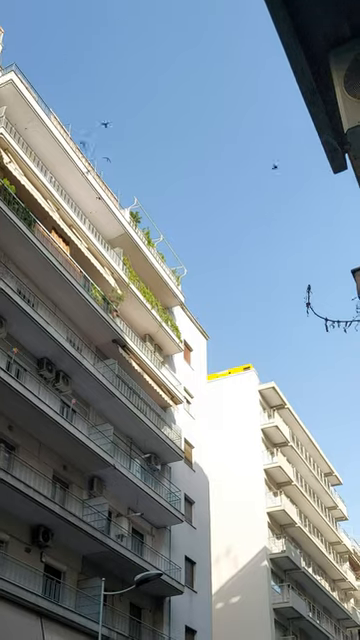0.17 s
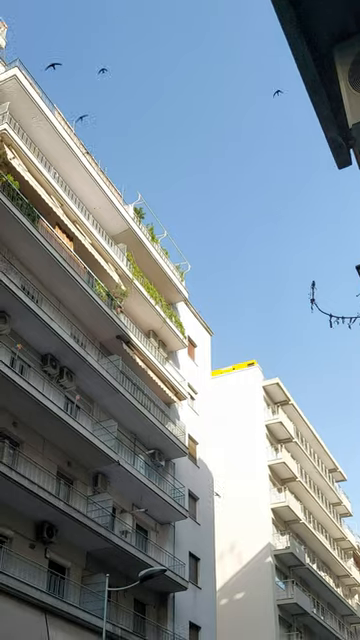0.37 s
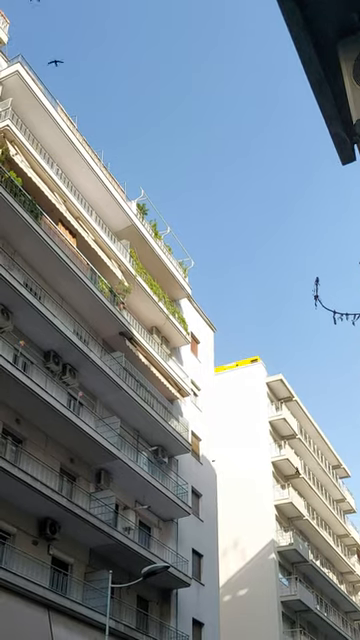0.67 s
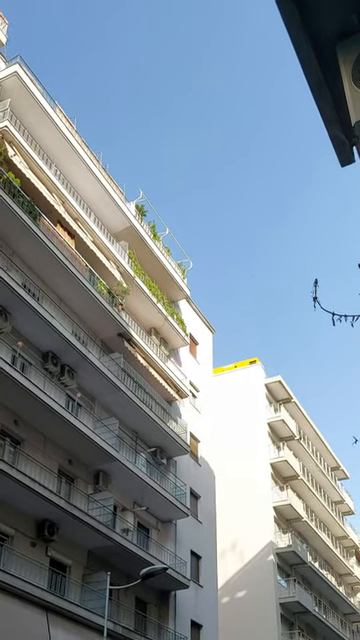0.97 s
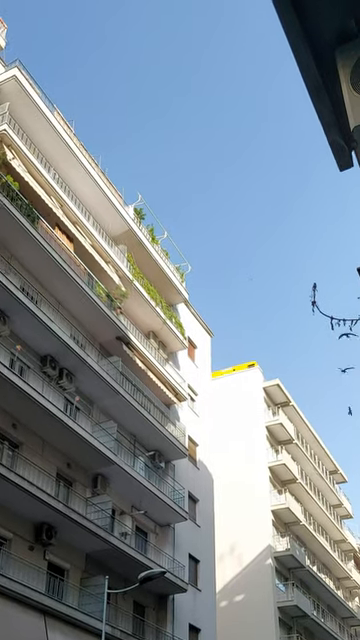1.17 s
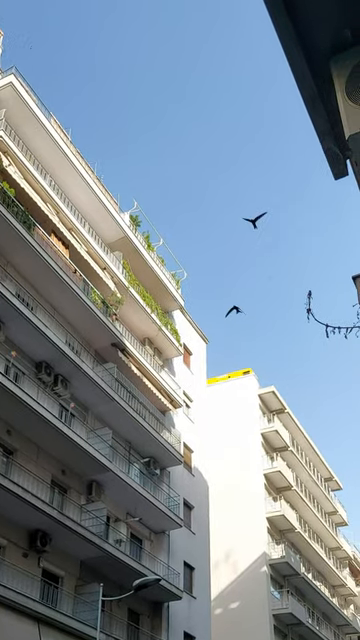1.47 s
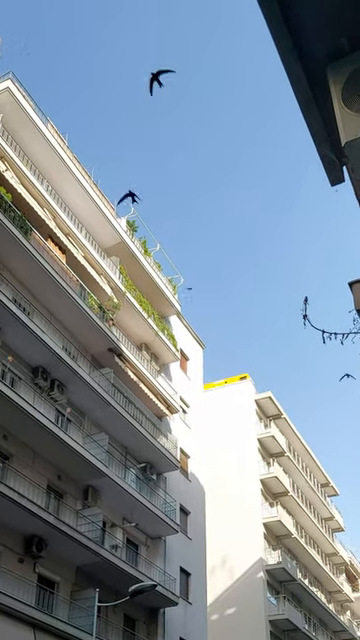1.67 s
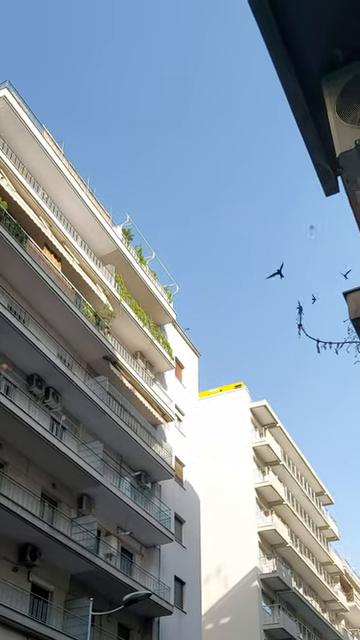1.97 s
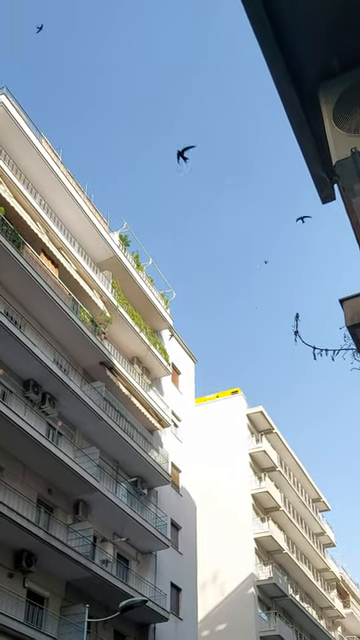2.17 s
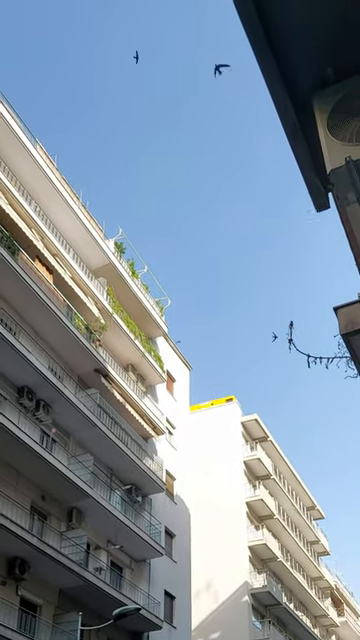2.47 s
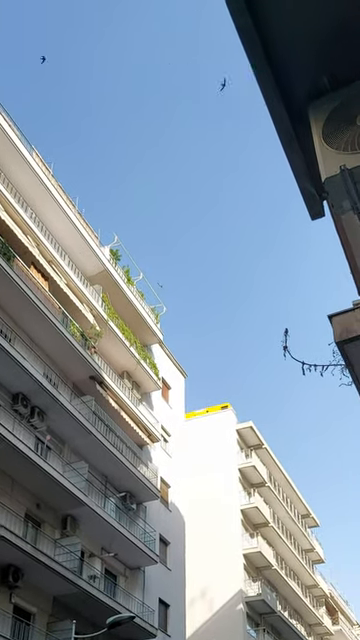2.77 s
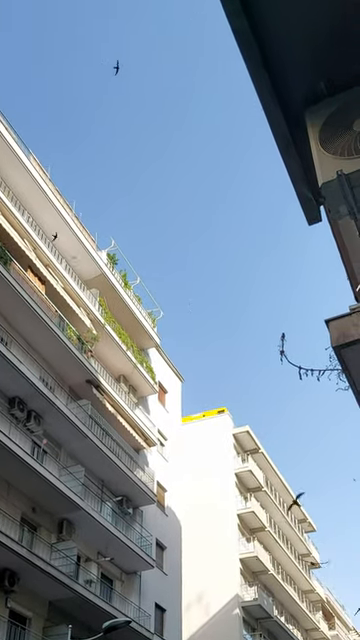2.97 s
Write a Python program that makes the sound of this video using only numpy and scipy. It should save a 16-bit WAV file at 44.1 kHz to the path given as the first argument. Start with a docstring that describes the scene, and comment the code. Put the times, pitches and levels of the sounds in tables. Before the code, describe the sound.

Shrill, raspy swift calls echo along a high-walled street above steady distant traffic rumble.

```python
"""After a moment of silence, swifts scream along a street of tall apartment blocks above the city's rumble.
Each scream is a shrill arched whistle with two overtones; low rasping trills of swept pulses come between.
Two birds pass close to the microphone with clearer, surging screams.
The facades answer with near echoes and a long scattered tail that loses its highest treble first.
The city is shaped noise: rumble and thin hiss, with a few far squeals and a wavering low hum."""
import sys
import numpy as np
from scipy import signal
from scipy.fft import rfft, irfft
from scipy.io import wavfile

SR = 44100
rng = np.random.default_rng(int(sys.argv[2]) if len(sys.argv) > 2 else 0)


def output_pcm(signal):
    """Save a mono or channel-first signal as 16-bit PCM at the path in sys.argv[1].

    Samples are clipped to [-1, 1] before scaling.
    """
    pcm = np.clip(np.atleast_2d(signal).T, -1, 1) * 32767
    wavfile.write(sys.argv[1], SR, np.round(pcm).astype(np.int16))


N = 138033
TIME, HZ = np.arange(N) / SR, np.fft.rfftfreq(N, 1 / SR)

# City: rms levels in dB of full scale
CITY_DB, HISS_DB, HUM_DB = -36.5, -50.5, -46.5
HUM_HZ, HUM_WAVER_HZ = 83.1, 2.92  # pitch and its rms waver

# Voice of every call: fades, rms flutter of the level
ATTACK_S, RELEASE_S, FLUTTER_DB = 0.0088, 0.017, 1
OCTAVE_DB, TWELFTH_DB = -24.5, -25  # base levels of a scream's overtones, each call adds its own offset
WAVER_HZ, WAVER_PER_S = 27.5, 74  # slow pitch waver, rms
RASP_HZ, RASP_PER_S = 273, 570  # fast pitch rasp, rms at roughness 1 halfway through a scream
CLOSE_ROUGH, CLOSE_OVERTONES_DB = 0.12, 0.5
TRILL_PER_S, TRILL_SWING_HZ, TRILL_DEPTH, TRILL_ATTACK_S = 170, 318, 0.5, 0.024

# Street: direct sound, near echoes off walls and balconies, long tail
TRILL_DIRECT_DB, CLOSE_TAIL_DB = -7, -3.5
ECHO_DB, ECHO_SPREAD_S = 0.5, .035  # all echoes together against the direct call, latest echo
TAIL_DB, TAIL_BUILD_S = -4, 0.075
BLOOM_DB, BLOOM_S = 3, 0.29  # extra early tail against the lasting part, its decay time

START_S, EDGE_HZ = .069, 15750  # end of the opening silence, upper band limit


def amp(db):
    """Decibels to gain."""
    return 10 ** (np.asarray(db) / 20)


def unit(x):
    """Scales to rms 1."""
    return x / np.sqrt(np.mean(x ** 2) + 1e-20)


def read(points, hz):
    """Reads a table on a log-frequency axis."""
    f, value = np.transpose(points)
    return np.interp(np.log(hz + 1), np.log(f + 1), value)


def add(mix, s, sound):
    """Mixes a sound in at time s."""
    part = mix[..., max(round(s * SR), 0):][..., :sound.shape[-1]]
    part += sound[..., :part.shape[-1]]


def wander(per_s):
    """Smooth random motion of rms 1, made of rates up to about per_s."""
    return unit(irfft(rfft(rng.standard_normal(N)) / (1 + (HZ / per_s) ** 4), N))


def lean(points):
    """Left and right gains by frequency, half of the difference on each side."""
    return amp(np.outer([.5, -.5], read(points, HZ)))


def hum():
    """A low tone wavering in pitch and level, as of an engine idling down the street."""
    phase = 2 * np.pi * np.cumsum(HUM_HZ + HUM_WAVER_HZ * wander(per_s=7.05)) / SR
    level_db = 6.2 * wander(per_s=3.7)
    return amp(HUM_DB) * unit(np.sin(phase) * amp(level_db))


def city_noise(spectrum):
    """Steady shaped noise, alike on both sides in the bass and diffuse above."""
    # left-right likeness of the city noise: hz, correlation
    likeness = [(40, 0.94), (90, 0.99), (180, 0.93), (350, 0.87), (700, 0.39), (1400, 0), (15000, 0.093)]
    # left-right balance of the city noise: hz, left_minus_right_db
    balance = [(50, 0.2), (180, -2.2), (600, -0.5), (1400, -7), (2800, -3), (5000, -2), (8000, 0.5),
               (14000, 5)]
    left, other = rfft(rng.standard_normal((2, N)))
    same = np.clip(read(likeness, HZ), -1, 1)
    right = same * left + np.sqrt(1 - same ** 2) * other
    shaped = np.array([left, right]) * amp(read(spectrum, HZ)) * lean(balance)
    return unit(irfft(shaped, N))


def squeal(length, pitch_hz, glide, db):
    """A gliding, slightly unsteady tone that swells and fades in one arch."""
    t = np.arange(0, length, 1 / SR)
    hz = pitch_hz + glide * t + 10 * wander(per_s=56)[:len(t)]
    phase = 2 * np.pi * np.cumsum(hz) / SR
    return amp(db) * unit(np.sin(np.pi * t / length) * np.sin(phase))


def city():
    """Traffic rumble that swells slowly, a thin hiss and a few far squeals."""
    # relative spectrum of the rumble: hz, density_db
    rumble_spectrum = [(15, -49), (25, -27.5), (48, -3), (85, -0.5), (134, -5), (166, -12), (199, -7.5),
                       (228, -11.5), (493, -14.5), (600, -17.5), (703, -16.5), (1090, -17), (1460, -20.5),
                       (1610, -18.5), (2800, -29), (3640, -56), (6160, -120)]
    # relative spectrum of the hiss: hz, density_db
    hiss_spectrum = [(2000, -35.5), (3000, 3), (3600, 4), (4500, 8.5), (5400, -4.5), (6200, -8), (8000, -7),
                     (9000, -18.5), (15500, -22)]
    # slow swell of the rumble: time_s, gain_db
    rumble_swell = [(0.1, 1), (0.7, 1.5), (1.3, .5), (1.55, -0.5), (2.0, -.5), (2.8, 1), (3.13, -0.5)]
    # faint tones of far traffic: start_s, length_s, pitch_hz, glide_hz_per_s, level_db
    far_squeals = [(0.068, 0.21, 1757, -250, -55.5), (0.467, 0.2, 1654, -220, -50.5),
                   (0.546, 0.24, 697.5, -9, -51.5)]
    swell_db = np.interp(TIME, *np.transpose(rumble_swell)) + .5 * wander(per_s=24)
    out = amp(CITY_DB + swell_db) * city_noise(rumble_spectrum)
    out += amp(HISS_DB) * city_noise(hiss_spectrum)
    for s, *shape in far_squeals:
        add(out, s, squeal(*shape))
    return out


def near_walls(call, count=10):
    """The direct call and a few early echoes, scattered anew for each call and side."""
    taps = np.zeros((2, SR // 4))
    taps[:, 0] = 1
    for side in taps:
        at = (rng.uniform(.05, 1, count) * ECHO_SPREAD_S * SR).astype(int)
        side[at] += amp(ECHO_DB) * rng.choice([-1, 1], count) / np.sqrt(count)
    return signal.fftconvolve(call[None], taps, axes=1)


def street(x):
    """Dense scattered echoes between the facades; the highest treble dies first."""
    # time for the lasting part of the tail to fall by 60 dB: hz, decay_s
    decay = [(3000, 1.57), (4500, 1.27), (5500, 1.5), (8000, 1.15), (14000, 0.56)]
    taps = rng.standard_normal((2, 2 * SR)) * (rng.random((2, 2 * SR)) < 2500 / SR)  # 2500 echoes a second
    hz, t, z = signal.stft(taps, SR, nperseg=256)
    fall = amp(-60 * t / read(decay, hz)[:, None])
    build = 1 - np.exp(-t / TAIL_BUILD_S)
    bloom = 1 + amp(BLOOM_DB) * np.exp(-t / BLOOM_S)
    tail = signal.istft(z * fall * build * bloom, SR, nperseg=256)[1]
    tail = tail / np.linalg.norm(tail, axis=1, keepdims=True)
    return signal.fftconvolve(x[None], tail, axes=1)[:, :N]


def voice(t, length, hz, octave_db, twelfth_db):
    """A fluttering whistle with two overtones that fades in and out."""
    phase = 2 * np.pi * np.cumsum(hz) / SR
    gains = [1, amp(octave_db), amp(twelfth_db)]
    tone = sum(g * np.sin((k + 1) * phase) for k, g in enumerate(gains))
    gate = np.clip(t / ATTACK_S, 0, 1) * np.clip((length - t) / RELEASE_S, 0, 1)
    flutter = amp(FLUTTER_DB * wander(per_s=123)[:len(t)])
    return unit(tone * gate * flutter)


def unsteady(t, rough):
    """Pitch offset in Hz: a slow waver plus a fast rasp that grows through the call."""
    waver = WAVER_HZ * wander(WAVER_PER_S)[:len(t)]
    rasp = RASP_HZ * rough * (.5 + t / t[-1]) * wander(RASP_PER_S)[:len(t)]
    return waver + rasp


def trill(length, pitch_hz, db, octave_db, twelfth_db):
    """Fast uneven pulses, each a downward sweep."""
    t = np.arange(0, length, 1 / SR)
    rate = TRILL_PER_S * (1 + .35 * wander(per_s=120)[:len(t)])
    beat = 2 * np.pi * np.cumsum(rate) / SR
    rasp = 150 * wander(RASP_PER_S)[:len(t)]
    hz = pitch_hz - TRILL_SWING_HZ * np.sin(beat) + rasp
    pulses = np.minimum(t / TRILL_ATTACK_S, 1) * (1 + TRILL_DEPTH * np.cos(beat))
    return amp(db) * pulses * voice(t, length, hz, octave_db, twelfth_db)


def scream(length, first_hz, top_hz, last_hz, rise_s, fall_power, db, swell_db, overtones_db, rough):
    """The pitch settles fast towards its top, then sags; the voice roughens towards its end."""
    t = np.arange(0, length, 1 / SR)
    u = t / length
    rise = (top_hz - first_hz) * np.exp(-t / rise_s)
    sag = (top_hz - last_hz) * u ** fall_power
    hz = top_hz - rise - sag + unsteady(t, rough)
    tone = voice(t, length, hz, OCTAVE_DB + overtones_db, TWELFTH_DB + overtones_db)
    return amp(db + swell_db * (u - .5)) * tone


def close_scream(curve):
    """A clearer scream from a near bird, in a few surges of level."""
    s, hz, db = np.transpose(curve)
    length = s[-1] - s[0]
    t = np.arange(0, length, 1 / SR)
    pitch = np.interp(t + s[0], s, hz) + unsteady(t, CLOSE_ROUGH)
    tone = voice(t, length, pitch, OCTAVE_DB + CLOSE_OVERTONES_DB, TWELFTH_DB + CLOSE_OVERTONES_DB)
    return amp(np.interp(t + s[0], s, db)) * tone


def swifts():
    """All calls, heard directly and through the street, coloured by throat, air and microphone."""
    # arched screams, level ahead of the street: start_s, length_s, first_hz, top_hz, last_hz, rise_s,
    # fall_power, level_db, swell_db (start to end), overtones_db, direct_db, roughness (0-1)
    scream_table = [ (0.022, 0.15, 5700, 5700, 5270, 0.016, 2.3, -44, -5, 5, -5, 0.83),
                    (0.164, 0.13, 3874, 5264, 4660, .025, 1.7, -32.5, 3, 3, -0.5, 0.45),
                    (0.575, 0.17, 4350, 4845, 4330, .035, 3, -33.5, -4.5, 3, -2, 0.26),
                    (0.604, 0.165, 4305, 5500, 4480, .026, 1.8, -30.5, -1.5, 0.5, -0.5, 0.21),
                    (0.673, 0.15, 5113, 5490, 4874, .02, 2.2, -33.5, -8, 3, -5.5, 0.39),
                    (0.858, 0.07, 4700, 4770, 4160, 0.019, 2.07, -33, -3, -5, -4, 0.39),
                    (1.36, 0.16, 5250, 5500, 5450, .04, 3.8, -55.5, -9, -24, -3, .4),
                    (1.746, 0.23, 4450, 4983, 4194, .03, 3.2, -42, -3.5, 4, -2.5, .33),
                    (2.358, 0.06, 4294, 4424, 3934, .01, 1.5, -43, -4, 5.5, 3.5, 0.14),
                    (2.898, 0.15, 4700, 5230, 3816, 0.032, 3.73, -34.5, 2, -9, -1.5, 0.37),
                    (3.006, 0.13, 4900, 5340, 5270, 0.024, 3.4, -40.5, -12, 1, -5.5, 0.43),
                    (3.023, 0.0406, 4356, 4344, 3915, .01, 1.21, -40, -2, -2, 4, 0.27), ]
    # rasping trills, level ahead of pulsing and street: start_s, length_s, pitch_hz, level_db,
    # octave_db, twelfth_db
    trill_table = [ (0.005, 0.077, 4380, -41, -9, -13), (0.272, 0.085, 3786, -41, -4.5, -6),
                   (0.419, 0.15, 4344, -35.5, -26, -22), (0.728, 0.132, 4456, -32, -17, -21.5),
                   (0.879, 0.057, 3963, -38, -7.5, -7.5), (0.962, 0.12, 4275, -38.5, -32, -22),
                   (2.09, 0.066, 4043, -36, -14, -18.5), (2.335, 0.075, 3997, -39.5, -24, -17.5),
                   (2.825, 0.087, 4156, -35.5, -16.5, -15), (2.927, 0.11, 4266, -32, -17.5, -15.5), ]
    # two birds that pass close by, one curve each: time_s, pitch_hz, level_db
    close_curves = [
        [(1.966, 4050, -44), (1.985, 4300, -38), (2.005, 4620, -30.5), (2.018, 4680, -35.5), (2.052, 4670, -25),
         (2.073, 4640, -35), (2.085, 4600, -24.5), (2.108, 4400, -35)],
        [(2.696, 4450, -39), (2.709, 4840, -31.5), (2.727, 4900, -28.5), (2.750, 4760, -37),
         (2.760, 4720, -25.5), (2.782, 4790, -30.5), (2.808, 4700, -30), (2.832, 4450, -30.5),
         (2.862, 4100, -39)],
    ]
    # side of the direct calls: time_s, left_minus_right_db
    flock_side = [(0.2, -2), (0.7, 2), (1.8, -3.5), (2.06, -1), (2.4, -1), (2.8, 1), (3.1, -1)]
    # left-right balance of calls and tail: hz, left_minus_right_db
    bird_balance = [(3500, -4), (5000, -1), (7500, 0), (10000, 0.5), (14000, 6.5)]
    # colour of throat, air and microphone together: hz, gain_db
    bird_colour = [(3000, 2), (3700, -1.5), (4500, -4.5), (5400, -6), (5900, -7.5), (6500, 5), (7400, 3.5),
                   (8300, -2.5), (8850, -11.5), (9700, -6), (11000, -6), (12500, -2.5), (14000, -2.5),
                   (15500, -6)]

    # each call: start_s, sound, direct_db, tail_db
    calls = [(s, scream(*shape, rough), direct_db, 0) for s, *shape, direct_db, rough in scream_table]
    calls += [(s, trill(*shape), TRILL_DIRECT_DB, 0) for s, *shape in trill_table]
    calls += [(curve[0][0], close_scream(curve), 0, CLOSE_TAIL_DB) for curve in close_curves]
    direct, sent = np.zeros((2, N)), np.zeros(N)
    for s, call, direct_db, tail_db in calls:
        add(sent, s, amp(tail_db) * call)
        add(direct, s, amp(direct_db) * near_walls(call))
    side_db = np.interp(TIME, *np.transpose(flock_side))
    direct = direct * amp(np.outer([.5, -.5], side_db))
    heard = rfft(direct + amp(TAIL_DB) * street(sent))
    return irfft(heard * lean(bird_balance) * amp(read(bird_colour, HZ)), N)


def scene():
    """Swifts above the city and its hum."""
    return hum() + city() + swifts()


def record(dry):
    """The sound sets in after a moment of silence; then the band limit."""
    edge = signal.firwin(511, EDGE_HZ, window=("kaiser", 9), fs=SR)
    return signal.oaconvolve(dry * (TIME >= START_S), edge[None], "same")


dry = scene()
out = record(dry)
output_pcm(out)
```